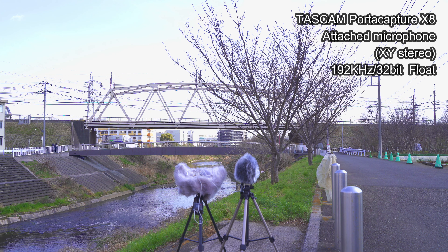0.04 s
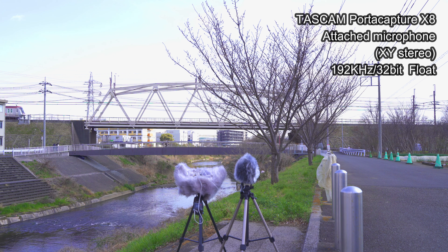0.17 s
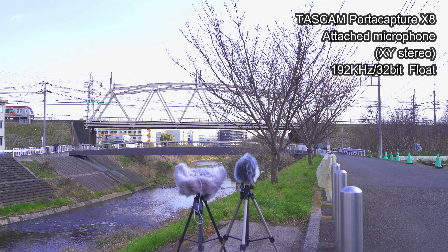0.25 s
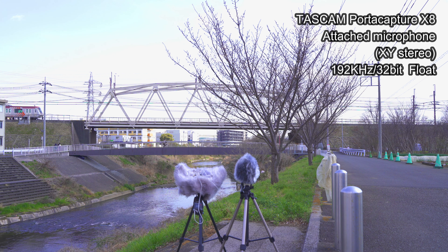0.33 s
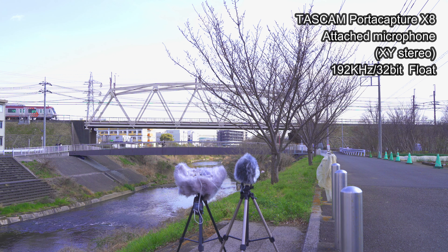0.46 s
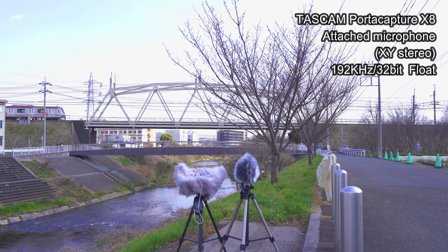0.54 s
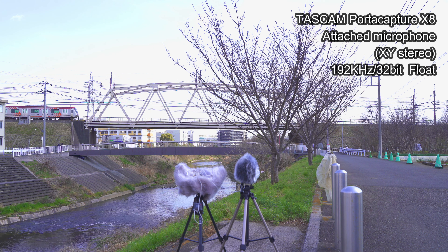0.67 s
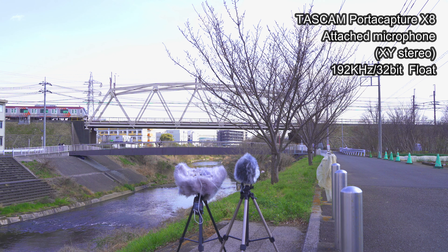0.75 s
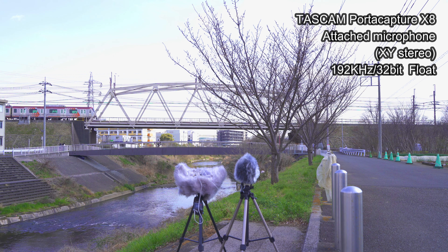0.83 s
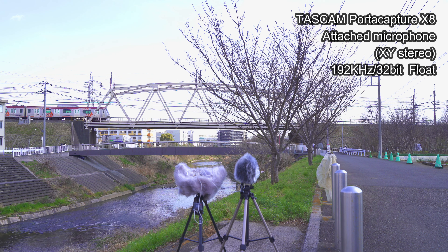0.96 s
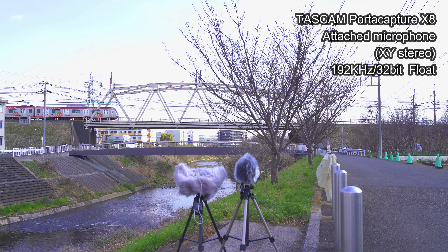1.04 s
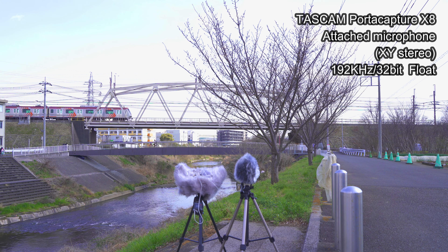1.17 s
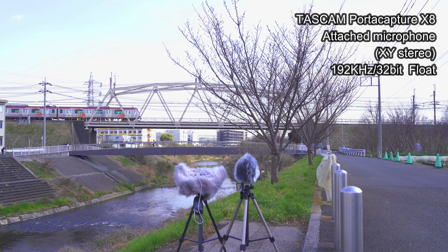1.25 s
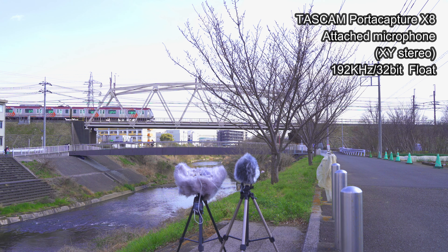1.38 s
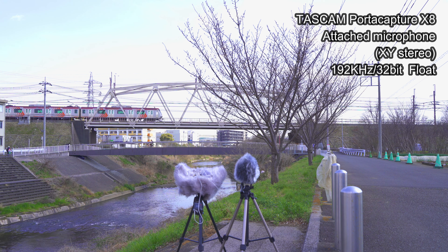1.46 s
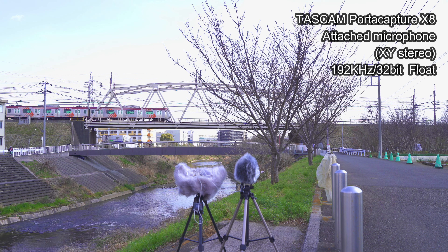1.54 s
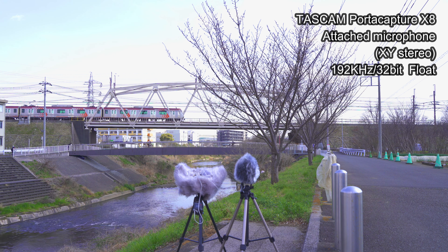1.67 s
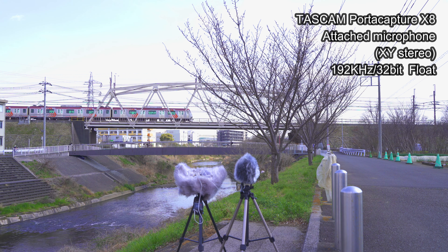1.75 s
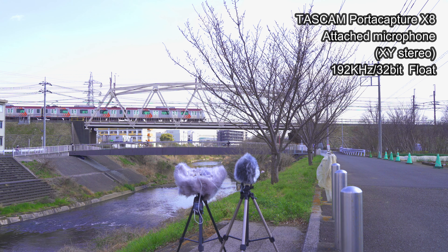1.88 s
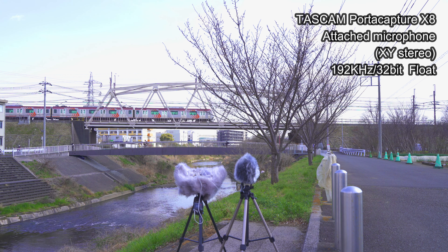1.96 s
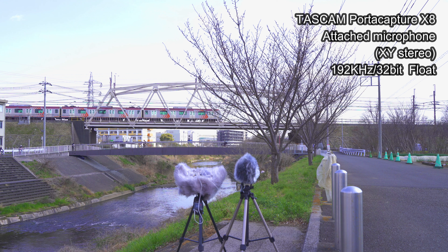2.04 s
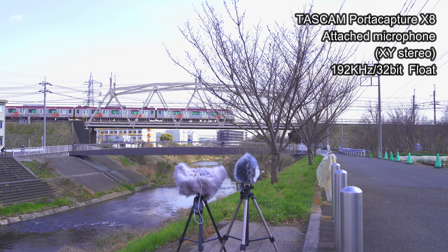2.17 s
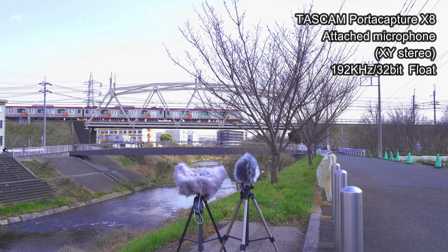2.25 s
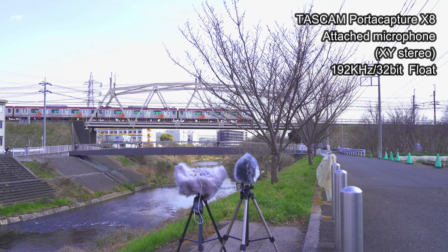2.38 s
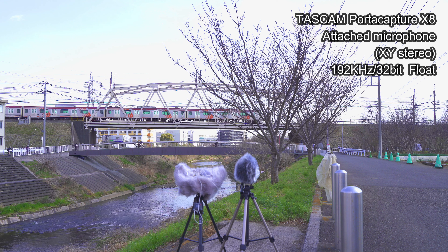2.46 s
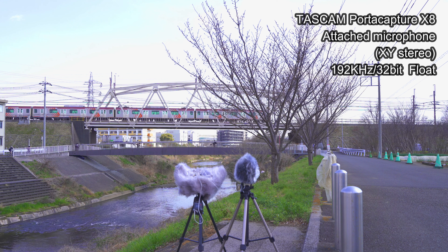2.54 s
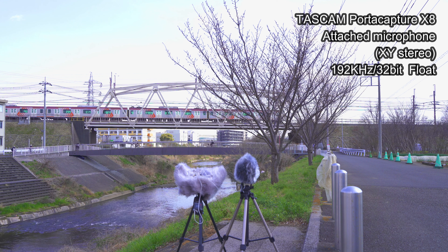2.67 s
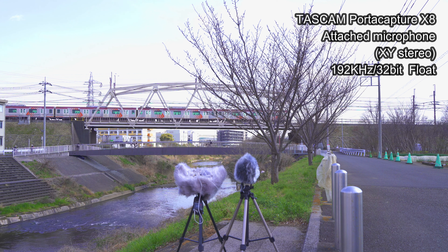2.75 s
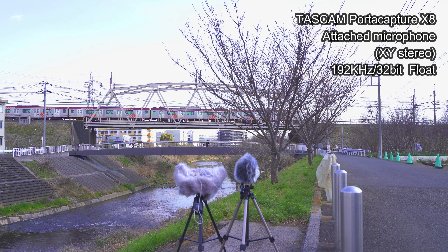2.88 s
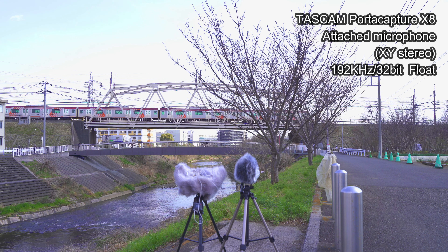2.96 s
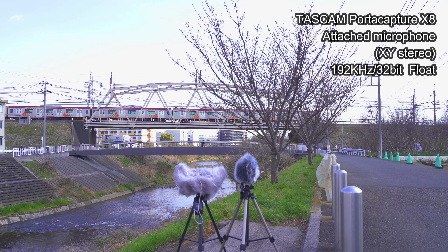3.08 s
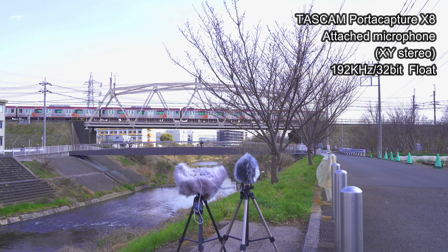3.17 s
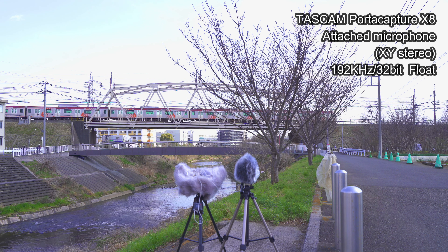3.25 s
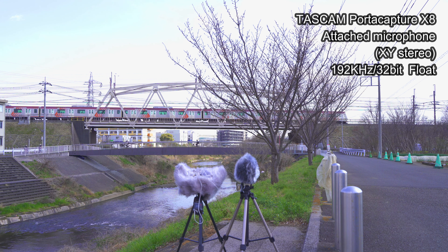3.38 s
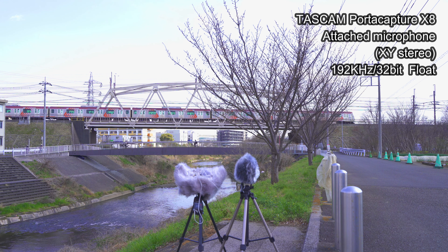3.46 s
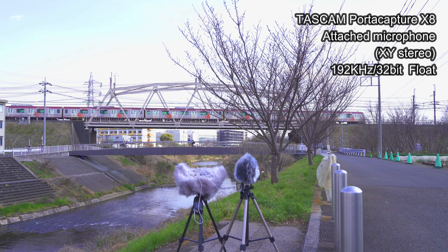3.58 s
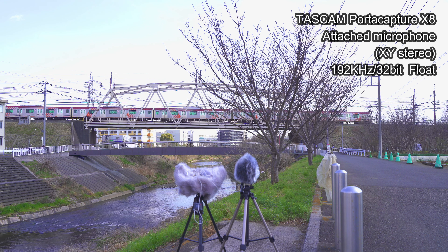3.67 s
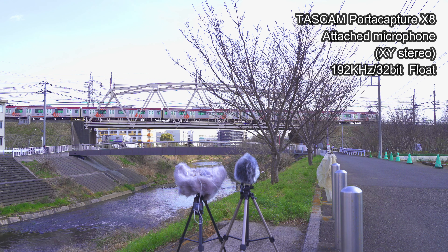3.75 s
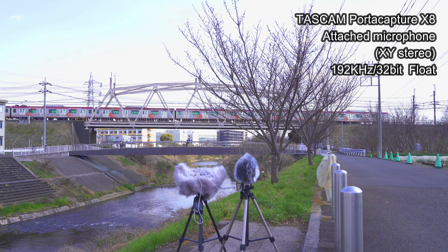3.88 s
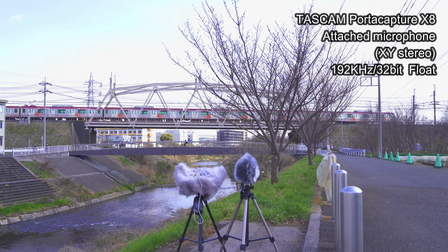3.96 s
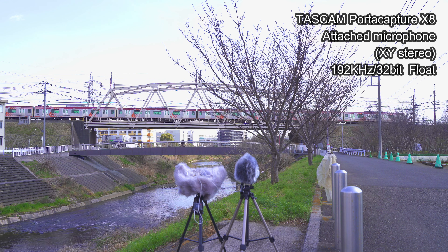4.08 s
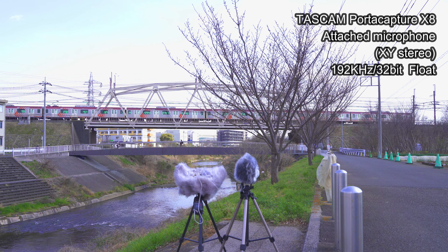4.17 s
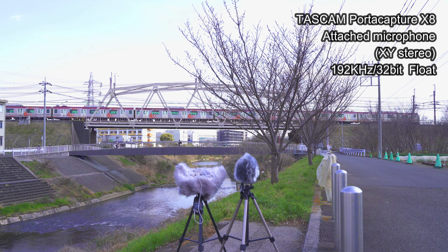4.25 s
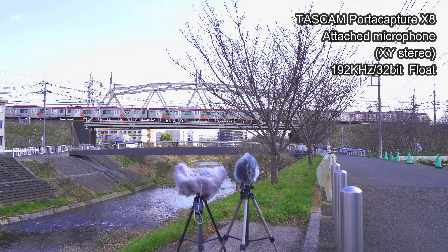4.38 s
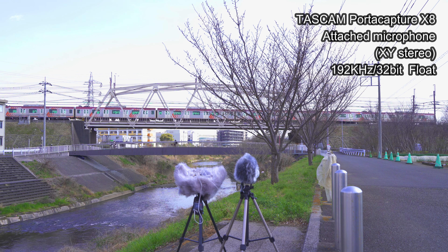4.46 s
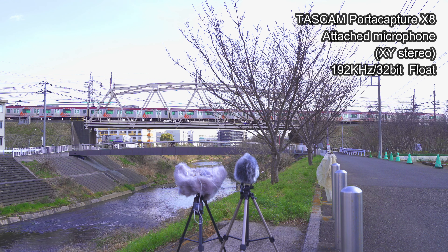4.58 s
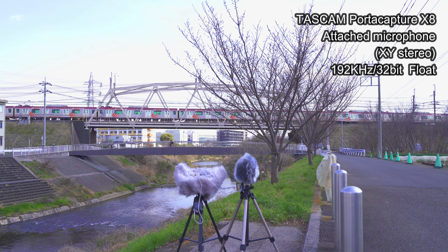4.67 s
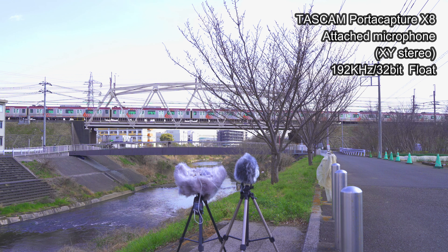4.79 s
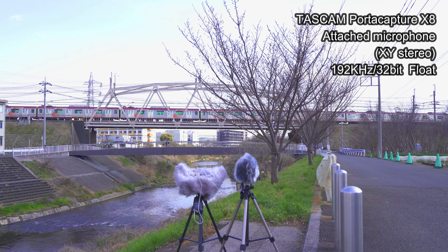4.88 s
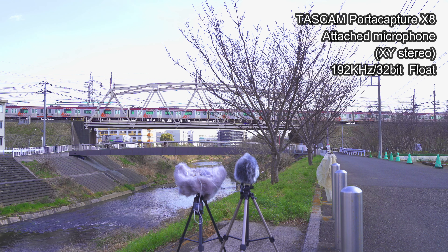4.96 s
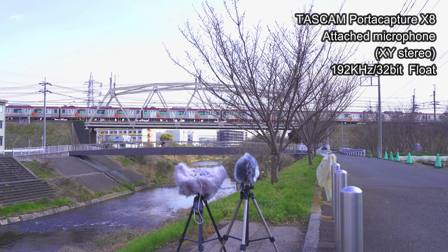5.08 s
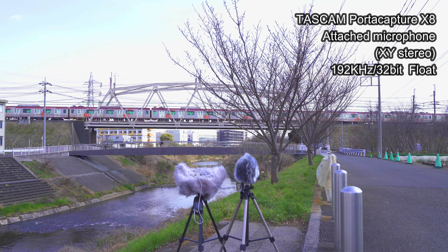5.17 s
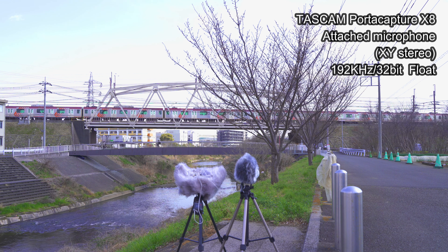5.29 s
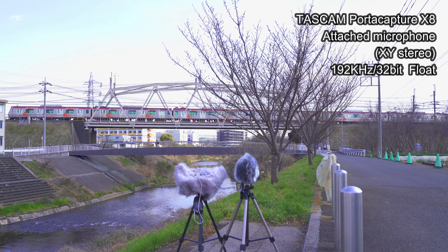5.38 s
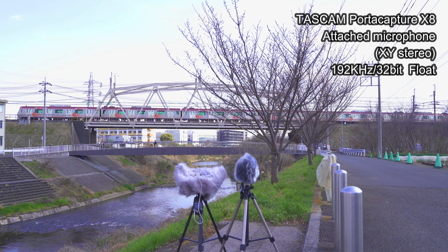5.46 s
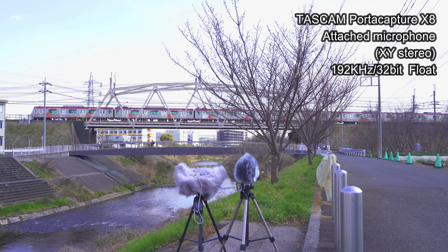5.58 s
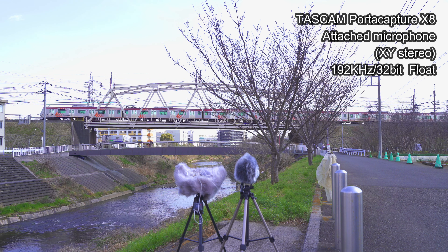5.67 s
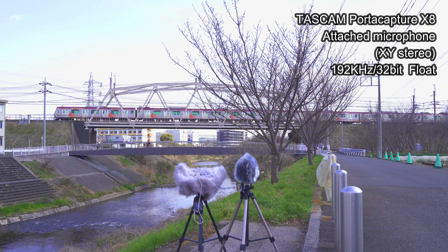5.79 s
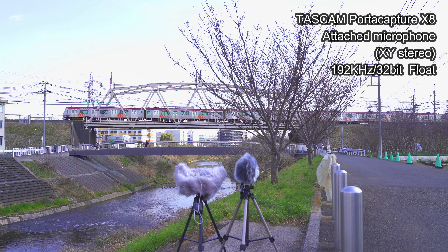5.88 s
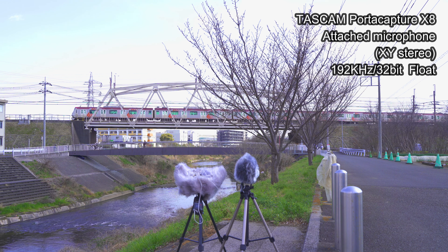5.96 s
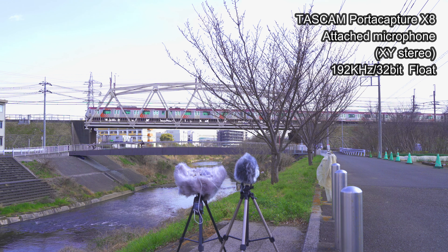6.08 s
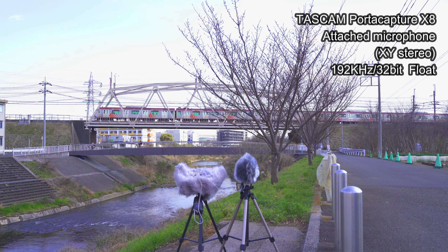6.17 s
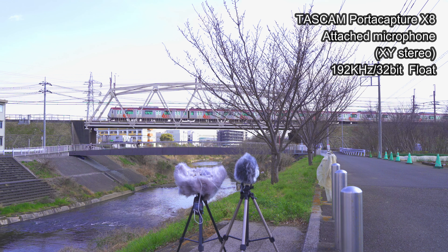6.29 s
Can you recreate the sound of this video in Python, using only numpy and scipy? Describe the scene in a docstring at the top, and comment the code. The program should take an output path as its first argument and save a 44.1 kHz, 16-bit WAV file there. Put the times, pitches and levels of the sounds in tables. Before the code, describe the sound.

A train approaches on the far left, its singing rails and ground rumble swelling over a quiet river wash. It suddenly rolls onto a steel truss span, which erupts in dense midrange roar, throbbing bass and clustered double knocks. Sharp plate clanks stand out irregularly, the strongest late in the crossing. Heard from the bank below by a crossed stereo pair, the sound gradually widens and moves right, still crossing at the end.

```python
"""A commuter train runs along an embankment and onto a steel truss bridge, heard from the river bank below.
On the embankment, rail hum, rolling noise and ground rumble are shaped noise that grows as it nears.
On the span, swelling low tones boom, resonant noise roars, decaying noise knocks at each axle and joint,
and decaying partials rattle and clank in the plates.
River and town are a steady noise wash; a crossed microphone pair listens."""
import sys
import numpy as np
from scipy import signal
from scipy.fft import rfft, irfft, next_fast_len
from scipy.io import wavfile
from scipy.ndimage import uniform_filter1d, minimum_filter1d, map_coordinates

SR = 44100
rng = np.random.default_rng(int(sys.argv[2]) if len(sys.argv) > 2 else 0)


def voltage_ratio(level):
    """Linear amplitude factor for a level in decibels (scalar or array-like)."""
    return 10 ** (np.asarray(level, float) / 20)


def output_pcm(signal):
    """Save a mono or channel-first signal as 16-bit PCM at the path in sys.argv[1].

    Samples are clipped to [-1, 1] before scaling.
    """
    pcm = np.clip(np.atleast_2d(signal).T, -1, 1) * 32767
    wavfile.write(sys.argv[1], SR, np.round(pcm).astype(np.int16))


N = 279153

SPEED_M_S, CAR_M = 26.18, 20
BOGIE_GAP_M, AXLE_GAP_M = 13.9, 2.2  # between a car's bogies, between a bogie's axles

# rail joints on the span: first axle t/s, clack/dB, thud/dB, second axle re first (clack, tick)/dB, tick/dB
JOINTS = [(1.29, -35.5, -24.5, 0.5, -47.5), (1.4524, -42.5, -25.5, 0, -52.5),
          (1.621, -35, -25, -2.5, -42.5)]
# load per car, front to back, added to its blows: front bogie/dB, rear bogie/dB
CAR_LOADS = [(.1, 2.5), (0, 2.6), (-.1, 1), (0.5, -2.5), (2.5, 0.5), (2.5, 0), (1, .1)]
# embankment rail modes: f/Hz, width at half amplitude/Hz, relative level/dB
RAIL_HUM = [(843, 93, -3), (1905, 36, -10.5), (2530, 74, -17.5)]
# bridge resonances: f/Hz, half-power width/Hz, level re flat response/dB
STEEL_MODES = [(94.4, 7.7, 1), (290, 28, 0), (486, 81, -1), (646, 34, -3.5), (806, 33, -2.5),
               (1900, 30, -10.5), (2440, 240, -3)]
# boom swells: crest t/s, f/Hz, crest rms level before pan/dB, base length/s
SWELLS = [(1.25, 51.5, -24.5, 0.27), (1.469, 47.4, -15, 0.33), (1.727, 45, -32, 0.26),
          (1.987, 50.7, -12.5, .27), (2.136, 49.2, -14.5, 0.26), (2.325, 45.8, -16.5, 0.33),
          (2.504, 42.4, -21, 0.22), (2.714, 47, -14, 0.22), (2.928, 52.6, -18, 0.3),
          (3.097, 45.2, -17, 0.37), (3.296, 45.7, -20, 0.24), (3.476, 45.2, -13.5, 0.28),
          (3.698, 49.5, -11, 0.21), (3.862, 43.2, -14.5, 0.34), (4.058, 41, -16, 0.23),
          (4.24, 44.7, -12.5, .3), (4.457, 49, -13, 0.27), (4.606, 44.7, -13, .27),
          (4.828, 42.2, -17.5, 0.28), (5.026, 43.4, -16, 0.35), (5.23, 50, -15, 0.24),
          (5.386, 45.4, -17, .26), (5.598, 47.3, -26, .25), (5.784, 44.3, -18.5, 0.32),
          (5.989, 49, -13, 0.19), (6.151, 45, -16, 0.3), (6.32, 50.4, -22, .18)]
# plate roar as bogies roll on and off: t/s, level before shake and pan/dB
PLATE_ROAR = [(1.3, -24.5), (1.36, -24.5), (1.42, -20), (1.55, -22.5), (1.72, -22.5), (1.79, -25.5),
              (1.92, -20), (1.97, -26), (2.1, -19.5), (2.2, -18), (2.36, -21), (2.42, -19.5), (2.5, -22),
              (2.75, -18.5), (2.99, -18.5), (3.32, -19.5), (3.76, -18.5), (3.82, -20), (4.2, -19.5),
              (4.66, -18.5), (5.05, -23), (5.2, -17.5), (5.55, -20), (5.8, -18), (6.33, -19)]
# loose plates slapped by wheels: t/s, peak level before pan/dB, strongest f/Hz
CLANKS = [(1.453, -20, 620), (1.516, -10.5, 665), (1.68, -13.5, 589), (1.826, -15, 430),
          (1.905, -14.5, 400), (2.018, -13, 450), (2.405, -12.5, 620), (2.815, -9.5, 614),
          (2.916, -12, 622), (3.762, -14, 622), (3.814, -15, 600), (4.504, -12, 610), (5.268, -4.5, 600),
          (5.464, -8.5, 533), (5.883, -23, 710), (6.273, -17, 783)]
# plate modes: f/Hz, relative level before scatter/dB, t60/s
PLATE_MODES = [(283, 3, .1), (400, -1, 0.13), (456, 0, 0.076), (525, 2.5, 0.053), (584, 5, 0.075),
               (622, -3, .12), (658, -5, 0.1), (715, -2.5, 0.12), (799, -2.5, 0.098), (960, 2, .06),
               (1150, 1.5, .05)]
# pan of the bridge: f/Hz, left re right/dB
BRIDGE_PAN = [(60, 2), (110, 0.5), (200, 2), (380, 3.5), (700, 2.5), (1290, 2.5), (2380, 2.5), (4400, 3),
              (8120, -0.5), (15000, 0.5)]

# left-right correlation of train, of river: f/Hz, correlation
TRAIN_ALIKE = [(40, 0.87), (90, 0.99), (180, 0.96), (550, 0.96), (1650, 0.99), (4970, 0.96), (15000, 0.55)]
RIVER_ALIKE = [(60, 0.77), (180, 0.8), (550, 0.48), (1650, 0.57), (4970, 0.64), (15000, 0.19)]

# spectrum of the embankment rolling noise: f/Hz, relative level/dB
EMBANKMENT = [(180, -29.5), (300, -4), (530, -6.5), (647, -7), (836, -2.5), (910, -4.5), (1060, -8),
              (1680, -13.5), (1910, -13.5), (3420, -28.5), (9000, -47.5), (11700, -71), (19800, -120)]
# spectrum of river and town: f/Hz, relative level/dB
RIVER = [(13, -25), (22, 15), (31, -19), (43, 3), (64, 2), (87, -9.5), (267, -21.5), (306, -14.5),
         (333, -25.5), (438, -22), (846, -33), (970, -27.5), (1980, -35.5), (5930, -51), (15500, -61.5)]
# spectra of girders, near end and whole span: f/Hz, relative level/dB
END_GIRDERS = [(35, -33.5), (60, -7.5), (86, -10.5), (140, -8), (210, -13.5), (286, -15.5), (349, -17.5),
               (380, -16.5), (490, -39), (840, -120)]
GIRDERS = [(35, -39.5), (60, 0.5), (75, -4), (102, -3.5), (199, -9), (286, -7), (328, -16), (380, -13),
           (490, -51), (840, -120)]
# spectra of plates, near end and whole span: f/Hz, relative level/dB
END_PLATES = [(180, -25.5), (300, -4), (350, -7), (403, 1.5), (534, 2), (638, 4), (780, -0.5),
              (1300, -15.5), (1690, -51), (2860, -120)]
PLATES = [(180, -43), (300, 1), (339, -2), (431, 3), (544, 1), (615, 4), (700, 1), (811, 5), (1300, -11),
          (1690, -22.5), (2860, -120)]
# spectra of bridge rails and their treble sizzle: f/Hz, relative level/dB
RAILS = [(590, -15), (1000, -3.5), (1190, -4.5), (1690, -11.5), (1840, -11), (4500, -35.5), (5850, -51),
         (9900, -120)]
SIZZLE = [(2240, -35.5), (3800, -4), (7450, -17.5), (12000, -34.5), (15600, -61), (22000, -120)]
# spectra of deck thuds at the first joint and past it: f/Hz, relative level/dB
DECK = [(88, -31.5), (150, 7.5), (199, -9), (317, 2), (410, 3), (500, -10), (634, -8), (968, -12),
        (2000, -32), (2600, -48.5), (4400, -120)]
INNER_DECK = [(88, -30.5), (150, -3), (199, -9.5), (317, -11.5), (450, -5.5), (560, 1.5), (640, -1.5),
              (800, -4), (968, -15), (2000, -35.5), (2600, -47.5), (4400, -120)]
# spectra of joint clack and of its bright edge: f/Hz, relative level/dB
CLACK = [(700, -58), (1200, -2.5), (2200, -3), (3200, -9.5), (4500, -21), (6500, -28.5), (9000, -59.5),
         (16000, -100)]
TICK = [(1800, -30), (3000, 2), (4500, -1), (6500, -9.5), (7800, -14), (9500, -21), (12000, -32.5),
        (16000, -73)]


def unit(x):
    """Scaled to rms 1."""
    return x / np.sqrt(np.mean(x ** 2) + 1e-20)


def along(points, hz):
    """(f/Hz, value) points interpolated on a log frequency axis."""
    f, v = np.transpose(points)
    return np.interp(np.log(hz + 1), np.log(f + 1), v)


def wobble(knots_per_s):
    """Smooth random curve through normal knots."""
    return map_coordinates(rng.standard_normal(N // 100), [np.arange(N) * knots_per_s / SR])


def filtered(x, response):
    """x through a gain over frequency."""
    m = next_fast_len(N + 8192)
    return irfft(rfft(x, m) * response(np.fft.rfftfreq(m, 1 / SR)), m)[..., :N]


def panned(x, left_re_right_db):
    """Level difference split evenly between the channels."""
    return x * voltage_ratio(np.outer([1, -1], left_re_right_db) / 2)


def rush(colour, alike, patchy_db):
    """Stereo noise of rms 1, its gain patchy over time and frequency by patchy_db rms."""
    z = signal.stft(rng.standard_normal((2, N + 512)), nperseg=512)[2]
    field = uniform_filter1d(rng.standard_normal(z.shape[1:]), size=6, axis=0)
    field = uniform_filter1d(field, size=10, axis=1)
    pair = signal.istft(z * voltage_ratio(patchy_db * unit(field)), nperseg=512)[1][:, :N]

    def mid_side_gain(hz):
        angle = np.arccos(np.clip(along(alike, hz), -1, 1)) / 2  # cos(2 angle) = correlation
        return colour(hz) * [np.cos(angle), np.sin(angle)]

    mid, side = filtered(pair, mid_side_gain)
    return unit(np.array([mid + side, mid - side]))


def coloured(spectrum, alike, patchy_db):
    """Stereo noise with a tabled spectrum."""
    return rush(lambda hz: voltage_ratio(along(spectrum, hz)), alike, patchy_db)


def since_entry():
    """Seconds since the first axle reached the span."""
    return np.arange(N) / SR - JOINTS[0][0]


def nearing(near_db, loss_db, last_s):
    """Level rising with the log of shrinking distance (loss_db per tenfold), then holding."""
    return near_db - loss_db * np.log10(1 + np.maximum(-since_entry(), 0) / last_s)


def approach():
    """Embankment track, far left: wheels excite rail modes and ground, growing until the bridge."""
    modes = lambda hz: sum(voltage_ratio(db) / (1 + (2 * (hz - c) / w) ** 2) for c, w, db in RAIL_HUM)
    hum_db = nearing(near_db=-38, loss_db=12, last_s=0.088) + 1.4 * wobble(7)
    hum = voltage_ratio(hum_db) * rush(modes, TRAIN_ALIKE, patchy_db=2.2)
    rolling_db = nearing(near_db=-34, loss_db=16, last_s=0.6)
    rolling = voltage_ratio(rolling_db) * coloured(EMBANKMENT, TRAIN_ALIKE, patchy_db=0.4)
    ground_db = nearing(near_db=-35, loss_db=10, last_s=0.37)
    ground = voltage_ratio(ground_db) * coloured(END_GIRDERS, RIVER_ALIKE, patchy_db=1)
    return panned(hum + rolling + ground, 5)


def river():
    """Far water and town: a wide, slightly uneven wash, stronger on the right."""
    wash = coloured(RIVER, RIVER_ALIKE, patchy_db=1.3)
    return panned(voltage_ratio(-27.5 + 0.35 * wobble(1.3)) * wash, -0.8)


def boom():
    """Lowest span modes: wavering tones that swell under the bogies, nearly centred."""
    out, waver_rad = np.zeros(N), 0.48 * wobble(16)
    for (s, hz, db, length_s), phase in zip(SWELLS, rng.random(len(SWELLS))):
        t = np.arange(N) / SR - s
        swell = np.cos(np.pi * np.clip(t / length_s, -0.5, 0.5)) ** 2
        out += voltage_ratio(db) * swell * np.sin(2 * np.pi * (hz * t + phase) + waver_rad)
    return panned(np.sqrt(2) * out, 0.6)  # sqrt(2): rms to peak


def filling(full_db, short_db, fill_s):
    """Level closing in on full_db from short_db below as the train covers the span."""
    return full_db - short_db * np.exp(-np.maximum(since_entry(), 0) / fill_s)


def span_angle():
    """Crossfade angle, 0 to pi/2, as the head of the train moves out over the span."""
    return np.clip((np.arange(N) / SR - 1.7) / 2.46, 0, 1) * np.pi / 2


def steel(spectrum, patchy_db):
    """Noise of one bridge part; resonances add power to a flat response."""
    def colour(hz):
        added = sum(voltage_ratio(2 * db) / (1 + (2 * (hz - c) / w) ** 2) for c, w, db in STEEL_MODES)
        return voltage_ratio(along(spectrum, hz)) * np.sqrt(1 + added)

    return rush(colour, TRAIN_ALIKE, patchy_db)


def spreading(end, whole, patchy_db):
    """Equal-power crossfade from near-end steel to whole-span steel."""
    angle = span_angle()
    return np.cos(angle) * steel(end, patchy_db) + np.sin(angle) * steel(whole, patchy_db)


def girders(shake):
    """Girder roar, plus sway noise around 46 Hz: neighbours of the boom mode."""
    sway = rush(lambda hz: 1 / (1 + ((hz - 46) / 13) ** 4), TRAIN_ALIKE, patchy_db=3.5)
    level_db = filling(full_db=-17, short_db=13, fill_s=1) + 0.33 * shake
    return voltage_ratio(level_db) * (spreading(END_GIRDERS, GIRDERS, patchy_db=0.31) + voltage_ratio(-9.5) * sway)


def rattle(rate_hz, centre_hz, spread, cycles, size_db):
    """Loose plates and bolts: short partials at random times and pitches, falling by 1/e in `cycles` periods."""
    count = int(rate_hz * N / SR)
    when, pitch, strength = rng.random((3, count, 1))
    hz = centre_hz * np.exp(spread * (2 * pitch - 1))
    t = np.arange(SR // 16) / SR
    envelope = np.exp(-t * hz / cycles) * (1 - np.exp(-t / 0.01)) * (1 - t / t[-1])
    rings = voltage_ratio(size_db * strength) * envelope * np.sin(2 * np.pi * hz * t)
    where = (when * N).astype(int) + np.arange(len(t))
    return unit(np.bincount(where.ravel(), rings.ravel(), N + SR)[:N])


def plates(shake):
    """Plate roar and loose-part rattle, both following the bogies."""
    load = voltage_ratio(np.interp(np.arange(N) / SR, *np.transpose(PLATE_ROAR)))
    roar = voltage_ratio(0.35 * shake) * spreading(END_PLATES, PLATES, patchy_db=0.17)
    loose = voltage_ratio(-10) * rattle(rate_hz=110, centre_hz=650.5, spread=0.788, cycles=5.9, size_db=9)
    return load * (roar + loose)


def rails(shake):
    """Rail roar and treble sizzle, filling at their own rates."""
    roar_db = filling(full_db=-22.5, short_db=11.8, fill_s=1.63) + 0.37 * shake
    sizzle_db = filling(full_db=-49.5, short_db=15, fill_s=0.49) + 0.4 * shake
    return voltage_ratio(roar_db) * steel(RAILS, patchy_db=0.23) + voltage_ratio(sizzle_db) * steel(SIZZLE, patchy_db=1)


def blows():
    """Every axle over every joint: t/s, joint index, clack/dB, thud/dB, tick/dB."""
    rows = []
    for joint, (s, clack_db, thud_db, second_db, tick_db) in enumerate(JOINTS):
        for car, load_db in enumerate(CAR_LOADS):
            for bogie in range(2):
                for axle in range(2):
                    behind_m = car * CAR_M + bogie * BOGIE_GAP_M + axle * AXLE_GAP_M
                    load, second = load_db[bogie], axle * second_db
                    rows.append((s + behind_m / SPEED_M_S, joint,
                                 clack_db + load + second, thud_db + load, tick_db + load + second))
    rows = np.array(rows)
    rows[:, 2:] += 0.8 * rng.standard_normal((len(rows), 3))  # scatter/dB
    return rows[rows[:, 0] < N / SR].T


def knocks(times_s, levels_db, rise_s, t60_s):
    """Envelope of joint blows: quick rise, then steel and valley ring out; blows add in power."""
    t = np.arange(SR // 2) / SR
    power = np.bincount((times_s * SR).astype(int), voltage_ratio(2 * levels_db), N)
    shape = (voltage_ratio(-60 * t / t60_s) * (1 - np.exp(-t / rise_s))) ** 2
    return np.sqrt(np.abs(signal.fftconvolve(power, shape)[:N]))


def joint_blows():
    """Axles strike rail joints: deck thud, mid-range clack, short bright tick."""
    times, joint, clack_db, thud_db, tick_db = blows()
    out = knocks(times, clack_db, rise_s=0.0083, t60_s=0.65) * steel(CLACK, patchy_db=2)
    out += knocks(times, tick_db, rise_s=0.006, t60_s=0.22) * steel(TICK, patchy_db=1.5)
    for on, deck in [(joint == 0, DECK), (joint > 0, INNER_DECK)]:
        out += knocks(times[on], thud_db[on], rise_s=0.006, t60_s=0.42) * steel(deck, patchy_db=2)
    return out


def clanks():
    """Slapped plates: each blow rings the modes near its pitch."""
    reach_hz, rise_s = 130, 0.0018
    out, t = np.zeros(N + SR), np.arange(SR // 4) / SR
    hz, mode_db, t60_s = np.transpose(PLATE_MODES)[:, :, None]
    for s, db, pitch_hz in CLANKS:
        size = voltage_ratio(mode_db + rng.normal(0, 1.8, hz.shape)) / (1 + ((hz - pitch_hz) / reach_hz) ** 2)
        modes = size * voltage_ratio(-60 * t / t60_s) * np.sin(2 * np.pi * hz * t)
        ring = np.sum(modes, axis=0) * (1 - np.exp(-t / rise_s))
        out[round(s * SR):][:len(t)] += voltage_ratio(db) * ring / np.abs(ring).max()
    return out[:N]


def narrowed(pair, side_db):
    """A source filling less of the view differs less between the capsules."""
    mid, side = (pair[0] + pair[1]) / 2, voltage_ratio(side_db) * (pair[0] - pair[1]) / 2
    return np.array([mid + side, mid - side])


def bridge():
    """Loaded span from the first axle on: roar, joint blows and clanks, widening and drifting right."""
    shake = wobble(10)  # slow random unevenness shared by girder, plate and rail roar
    parts = girders(shake) + plates(shake) + rails(shake) + joint_blows() + clanks()
    roar = narrowed(parts, -2.5 * np.cos(span_angle()))
    loaded = np.clip(since_entry() / 0.0036, 0, 1)
    roar = filtered(loaded * roar, lambda hz: voltage_ratio(np.outer([1, -1], along(BRIDGE_PAN, hz)) / 2))
    return panned(roar, 0.57 - 0.24 * since_entry())  # the loudest part moves with the train


def scene():
    """All sources at the microphone pair."""
    return approach() + river() + boom() + bridge()


def band_limit(x):
    """A steep low-pass at the top of the band."""
    return signal.sosfilt(signal.butter(12, 15710, fs=SR, output="sos"), x)


def record(dry):
    """A gentle limiter keeps peaks under full scale."""
    needed = np.minimum(1, 0.98 / (np.abs(dry).max(axis=0) + 1e-9))
    gain = uniform_filter1d(minimum_filter1d(needed, size=801), size=400)
    return band_limit(dry * gain)


dry = scene()
out = record(dry)
output_pcm(out)
```